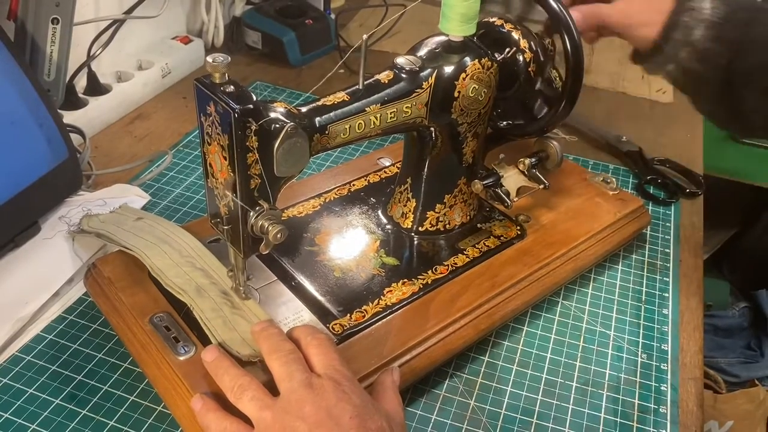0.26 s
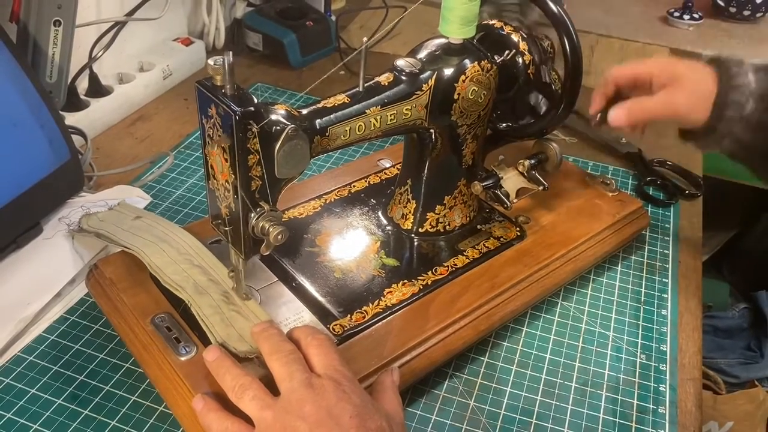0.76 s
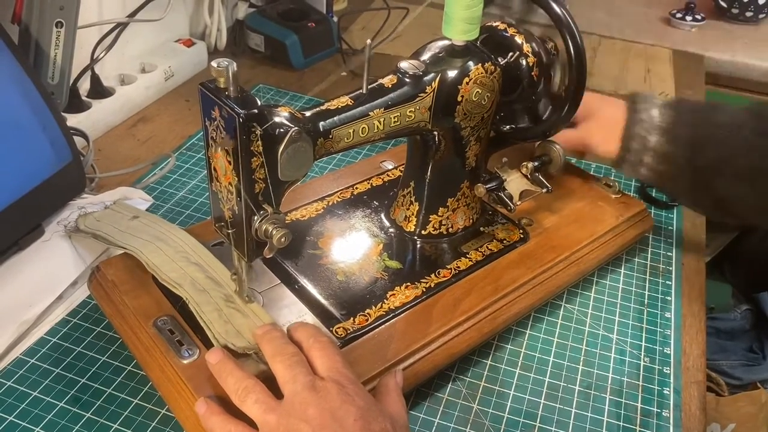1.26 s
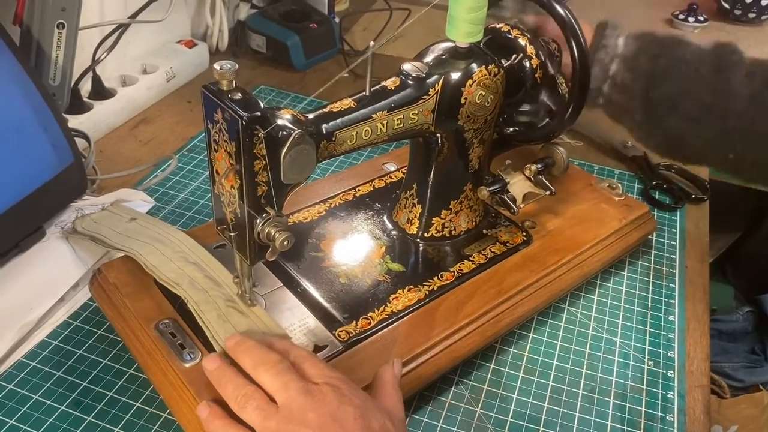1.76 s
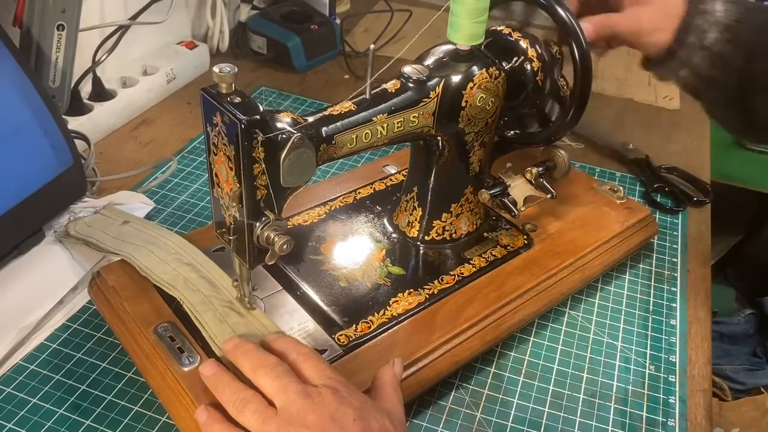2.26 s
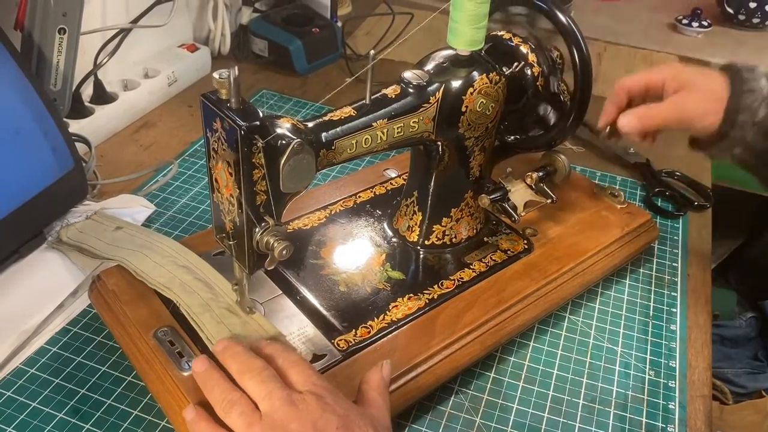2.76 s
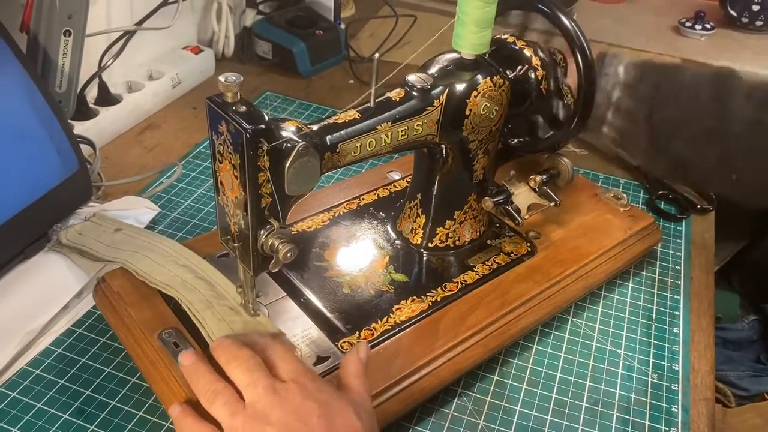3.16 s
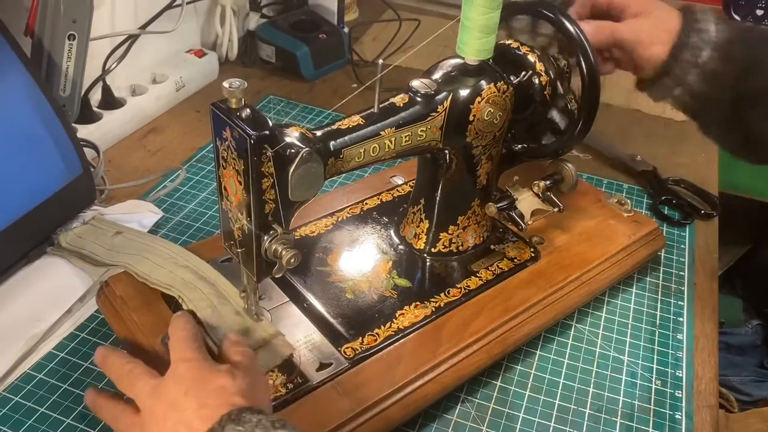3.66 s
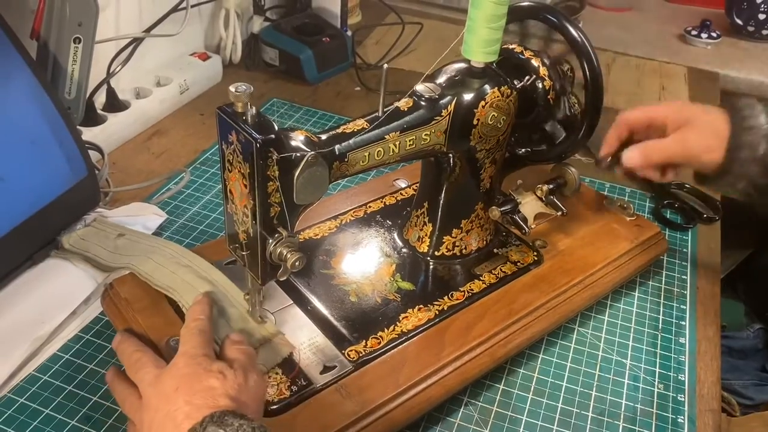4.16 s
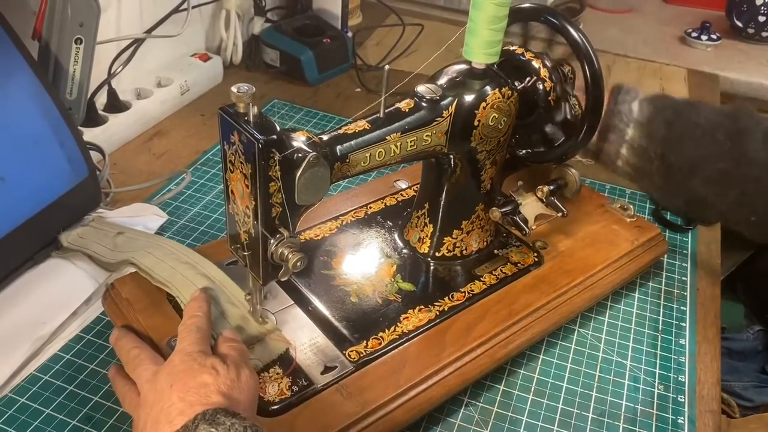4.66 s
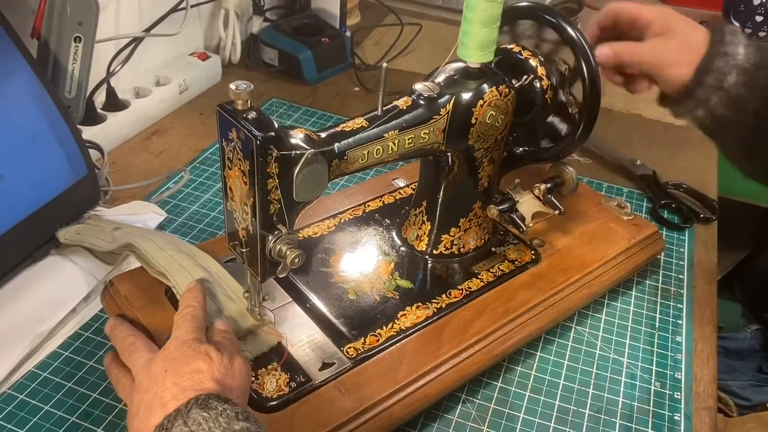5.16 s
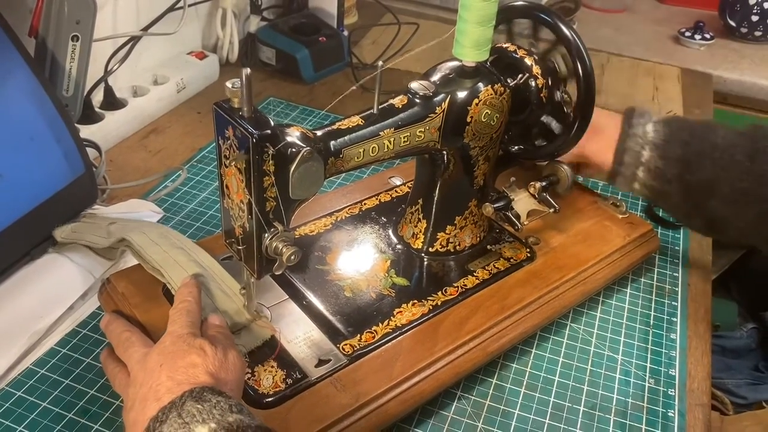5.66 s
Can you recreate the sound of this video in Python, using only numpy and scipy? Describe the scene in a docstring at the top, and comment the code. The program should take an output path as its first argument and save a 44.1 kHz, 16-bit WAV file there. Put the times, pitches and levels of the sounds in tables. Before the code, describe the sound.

An old hand-cranked sewing machine heard close in a small workshop. Each stitch is a hollow wooden-iron knock followed by a lighter second knock, with metallic chatter and gear rattle between. About four stitches a second, steady until three and a half seconds, then softer and gradually slower, with loose taps. Low bench rumble underneath; short dry room, close stereo microphone, slightly louder on the left.

```python
"""A hand-cranked cast-iron sewing machine on a hollow wooden base stitches about four times a second, then
slows. Every stitch has a needle-bar knock, a shuttle knock and lighter contacts near fixed crank angles, made
as clicks that ring the modes of wood and iron and start noisy chatter in small steel parts; gears and thread
rattle between. Below it the bench rumbles as filtered noise, and now and then a dull bump with a sinking pitch
shakes the microphone pair. A close pair of microphone ports hears the machine from the left, with a short
diffuse workshop tail behind it."""
import sys
import numpy as np
from scipy import signal
from scipy.fft import rfft, irfft
from scipy.io import wavfile

SR = 44100
rng = np.random.default_rng(int(sys.argv[2]) if len(sys.argv) > 2 else 0)


def generate_wav(signal):
    """Clip the signal to [-1, 1] and save it as 16-bit WAV at the path in sys.argv[1]."""
    frames = np.transpose(np.atleast_2d(signal))
    scaled = np.clip(frames, -1, 1) * 32767
    pcm = np.round(scaled).astype(np.int16)
    wavfile.write(sys.argv[1], SR, pcm)


N = 260190

# All levels in dB are relative: body, chatter and port gains come on top.
# Needle-bar knocks, one a stitch. Each row: time in seconds, strength in dB.
NEEDLE_BAR = [(0.0085, -20), (0.2416, -18), (0.4718, -18.5), (0.6947, -19.5), (0.9162, -17.5),
              (1.1403, -17.5), (1.3586, -18.5), (1.5856, -18), (1.8151, -19), (2.0326, -17.5), (2.252, -19),
              (2.4763, -18), (2.6949, -18), (2.9248, -19), (3.1588, -18), (3.3939, -18.5), (3.6283, -21),
              (3.888, -23), (4.1276, -21), (4.3659, -22), (4.6197, -22), (4.8719, -22), (5.1313, -24),
              (5.45, -28), (5.8051, -31)]
# Shuttle knocks, about a quarter of a stitch later. Each row: time in seconds, strength in dB.
SHUTTLE = [(0.0648, -29), (0.2987, -25), (0.5222, -23), (0.7498, -24), (0.9699, -23.5), (1.1919, -20.5),
           (1.4122, -22.5), (1.6419, -22), (1.8673, -21.5), (2.0847, -22.5), (2.308, -21), (2.527, -20.5),
           (2.7501, -22.5), (2.9836, -26.5), (3.2138, -24.5), (3.4519, -23.5), (3.6925, -29),
           (3.9454, -23.5), (4.1819, -27), (4.4237, -27), (4.6808, -24.5), (4.9335, -27), (5.2038, -32),
           (5.5273, -35)]
# Louder slack taps, more of them as the crank slows. Each row: time in seconds, strength in dB.
SLACK_TAPS = [(1.711, -36.5), (3.57, -34.5), (3.773, -38.5), (4.019, -39), (4.257, -35.5), (5.013, -34.5),
              (5.059, -36.5), (5.289, -35.5), (5.312, -41), (5.363, -34.5), (5.612, -42.5), (5.628, -37),
              (5.656, -35.5), (5.71, -30)]
# Light contacts in every stitch, at the head and at the bed. Each row: share of the stitch (0 to 1),
# clack in dB, base boom in dB, arm ring in dB, treble in dB above the clack.
FEED = [(.105, -45.5, -39, -42, -7)]
LINKAGE = [(.35, -56.5, -44.5, -49, -0.5), (.43, -58, -42.5, -52.5, 0.5), (.555, -52.5, -41, -50.5, -5.5),
           (.62, -61, -48, -55, -4.5), (.765, -67.5, -41, -63, -2), (.845, -62.5, -47.5, -54, 0)]
# How a blow of usual strength sounds. Each: usual strength in dB, clack in dB, arm ring in dB, treble in dB
# above the clack, clack in dB per dB of strength, arm ring in dB per dB of strength,
# treble in dB per dB of crank force.
NEEDLE_VOICE = (-20, -37, -32.5, -1, 0.11, 1.26, .6)
SHUTTLE_VOICE = (-25, -36, -30.5, 0.76, 0, 0.7, 0.73)
TAP_VOICE = (-34.5, -47, -56, -4, 1.04, 2.5, -0.3)
# Modes of the wooden base; close modes of opposite polarity swell, then cancel. Each row: frequency in Hz,
# t60 in seconds, polarity (+1 or -1), dB under the needle bar, dB under the shuttle, dB in the rattle.
BASE_MODES = [(291.3, 0.05, 1, -6.5, 0, -12), (309.9, 0.059, -1, 1.5, 5.5, -2),
              (365.8, 0.081, 1, -0.5, -2, 1.5), (390.5, 0.054, -1, -11.5, -11, -2),
              (468.6, 0.082, -1, -25.5, -16.5, -6.5), (508.7, 0.13, 1, -20, -23, -7),
              (518.5, 0.037, -1, -28, -22, -13), (706, .08, 1, -27.5, -25.5, -15.5),
              (832, 0.0093, -1, -31.5, -31, -23.5)]
# Modes of the iron arm. Each row: the same columns and units as the base.
ARM_MODES = [(985, 0.035, 1, -12, -3, -8), (1087.6, 0.053, -1, -3.5, -3, -0.5),
             (1163, 0.055, 1, -3.5, -6.5, 0), (1300, 0.043, -1, -9, -11, -0.5),
             (1469, 0.022, 1, -12.5, -18.5, 6.5)]
# Modes of small steel parts. Each row: frequency in Hz, width in Hz, dB under the needle bar,
# dB under the shuttle.
STEEL_MODES = [(1630, 140, 2.5, 4.5), (1869, 160, 2.5, 7.5), (2272, 52, -4.5, 4.5), (2521, 55, 0.5, -1.5),
               (2730, 74, -1, -16), (3124, 96, 0.5, -7), (4204, 76, -4, -15.5), (4474, 140, -5.5, -19),
               (4866, 70, -3, -5.5), (5300, 79, -8.5, -2.5), (5710, 120, -8.5, -5.5),
               (6040, 200, -11.5, -9.5), (6444, 35, -8, -18.5), (6480, 53, -14.5, -17)]
# Spectrum of the unpitched clack. Each row: frequency in Hz, level in dB.
CLACK = [(500, 11), (1000, 2), (2000, 1.5), (2800, -2), (3500, -23), (4500, -7.5), (5800, -11),
         (7000, -26.5), (8500, -55)]
# Loose play in base, arm, steel and steel treble, loud under load, then easing. Each entry: idle level in dB,
# load from (share of the stitch), level there in dB, load to (share of the stitch), level there in dB.
RATTLE = dict(base=(-49, -0.2, -43, 0.72, -44), arm=(-67, 0.15, -56, 0.73, -58),
          steel=(-67.5, 0.1, -65, 0.63, -58), treble=(-65.5, .2, -55, 0.7, -59.5))
# Force on the crank. Each row: time in seconds, force in dB.
EFFORT = [(0, 3.5), (1, 2), (2, 3), (3, 2.5), (3.7, 1.5), (4.4, 1.5), (5, 1.5), (5.3, -3), (5.6, -3.5),
          (5.9, -3.5)]
# Rumble of bench and building. Each row: frequency in Hz, level in dB per Hz.
RUMBLE = [(15, -23.5), (25, -9), (38, 3), (59, 7), (102, -5.5), (123, -15), (172, -1), (204, -21.5),
          (260, -13), (340, -27.5), (570, -120)]
# Right port against left. Each row: frequency in Hz, phase behind in radians, level in dB,
# share of unrelated sound (0 to 1).
PORTS = [(30.2, 1.3, -6.5, 0.84), (62.4, 2.4, -3.5, 0.28), (107, 2.08, -6, 0.71), (187, 3.4, -1.5, 0.45),
         (279, 4.675, -4, 0.061), (372, 4.65, -8.5, 0.06), (710, 4.51, -4, 0.43), (990, 4.99, -1, 0.13),
         (1240, 5.07, -7.5, 0.13), (1554, 8.13, -9, 0.13), (2010, 7.79, -2, 0.59), (2420, 8.57, -8.5, 0.63),
         (3250, 3.77, -9, 0.94), (4310, 8.22, 2.5, 1), (5250, 9.18, -1.5, 1), (6130, 11.9, -3, 0.7),
         (6220, 9.46, -3, 0.65), (7950, 3.86, -5, 0.13)]
# Dull bumps that reach the microphone pair directly. Each row: time in seconds, level in dB, time constant of
# the sinking pitch in ms.
BUMPS = [(1.858, -35.5, 10.7), (1.898, -38, 11), (3.088, -39.5, 11.7), (3.904, -46, 14), (4.125, -37, 12.7),
         (4.299, -34.5, 4.7), (4.881, -39, 9.2)]

TOUCH_S = 0.0016   # the parts touch this long before the blow is at full strength
TREBLE_HZ = 3400   # steel above this has its own share of each blow and its own rattle
STITCH_BEFORE_S, LAST_STITCH_S = 0.225, 0.37
LOAD_EDGE = 0.025   # share of the stitch that the load takes to come and go
WANDER, UNEVEN_DB = 0.006, 2   # light contacts vary in angle (share of the stitch) and strength
RUMBLE_DB, RUMBLE_FOLLOWS = -44.5, 0.68   # rms at 0 dB of crank force; dB per dB of crank force
SHOP_T60_S, SHOP_DB = 0.28, -18.5
TOP_STOP_HZ = 9140.04   # the top is 40 dB down from here


def amp(db):
    """dB to gain."""
    return 10 ** (np.asarray(db) / 20)


def rms_one(x):
    """Scale to rms 1."""
    return x / np.sqrt(np.mean(x ** 2) + 1e-20)


def on_grid(rows, column=1, size=N):
    """One column of a spectrum at every FFT bin, straight on a log-frequency axis."""
    rows = np.array(rows)
    hz = np.maximum(np.fft.rfftfreq(size, 1 / SR), 1)
    return np.interp(np.log(hz), np.log(rows[:, 0]), rows[:, column])


def crank_times():
    """Times at which each stitch starts, with one before and one after."""
    knocks = np.array(NEEDLE_BAR)[:, 0]
    return np.r_[knocks[0] - STITCH_BEFORE_S, knocks, knocks[-1] + LAST_STITCH_S]


def effort(t):
    """Force on the crank in dB."""
    return np.interp(t, *np.transpose(EFFORT))


def bench():
    """Low rumble of bench and building: shaped noise, partly driven by the cranking."""
    level_db = RUMBLE_DB + RUMBLE_FOLLOWS * effort(np.arange(N) / SR)
    spectrum = rfft(rng.standard_normal(N)) * amp(on_grid(RUMBLE))
    return amp(level_db) * rms_one(irfft(spectrum, N))


def grains(per_s, spread_db):
    """Random tiny contacts of very uneven size; rms 1."""
    sizes = amp(spread_db * np.minimum(rng.exponential(1, N), 4))
    signed = sizes * rng.choice([-1, 1], N)
    return rms_one(signed * (rng.random(N) < per_s / SR))


def rattle():
    """Levels of the loose play in base, arm and steel, read at the crank angle between needle-bar knocks."""
    t, starts = np.arange(N) / SR, crank_times()
    angle = np.interp(t, starts, np.arange(len(starts))) % 1
    plays = []
    for idle_db, on, on_db, off, off_db in RATTLE.values():
        corners = [on - LOAD_EDGE, on, off, off + LOAD_EDGE]
        load_db = np.interp(angle, corners, [idle_db, on_db, off_db, idle_db])
        plays.append(amp(effort(t) + load_db))
    return plays


def voiced(rows, voice):
    """Rows (s, clack, boom, arm, treble dB): boom is the strength, clack and arm follow it, treble the crank force."""
    s, db = np.transpose(rows)
    usual_db, clack_db, arm_db, treble_db, clack_follows, arm_follows, treble_follows = voice
    stronger_db = db - usual_db
    clack = clack_db + clack_follows * stronger_db
    arm = arm_db + arm_follows * stronger_db
    return np.c_[s, clack, db, arm, treble_db + treble_follows * effort(s)]


def clicks(rows, *columns):
    """One click per row, at first touch; the dB of the given columns add up."""
    rows, out = np.array(rows), np.zeros(N) + 1e-18
    at = np.clip(((rows[:, 0] - TOUCH_S) * SR).astype(int), 0, N - 1)
    out[at] = amp(rows[:, list(columns)].sum(axis=1))
    return out


def ring(x, hz, t60):
    """A damped resonator: a unit click sets a sine of height about 1 ringing."""
    r, w = amp(-60 / (t60 * SR)), 2 * np.pi * hz / SR
    return signal.lfilter([0, np.sin(w)], [1, -2 * r * np.cos(w), r * r], x)


def body(modes, blows, play, blow_db, contact_s, uneven_db, bed_lead_s, column):
    """All blows and the rattle ring one set of modes; head and bed contacts reach them differently."""
    head, bed = (clicks(rows, column) for rows in blows)
    bed = np.roll(bed, -round(bed_lead_s * SR))   # the carrier loads the bed just before the shuttle clacks
    struck, loose = np.zeros(N), np.zeros(N)
    for hz, t60, polarity, head_db, bed_db, rattle_db in modes:
        uneven = amp(uneven_db * rng.standard_normal(N))
        push = uneven * (amp(head_db) * head + amp(bed_db) * bed)
        struck += polarity * ring(push, hz, t60)
        loose += ring(amp(rattle_db) * grains(220, 4.2), hz, t60)
    soft = np.hanning(int(contact_s * SR) + 3)   # the contact lasts a moment
    struck = signal.lfilter(soft / soft.sum(), [1], struck)
    smooth_play = signal.lfilter([0.01], [1, -0.99], play)
    return amp(blow_db) * struck + smooth_play * rms_one(loose)


def fade(x, t60, rise_s):
    """Each click becomes an envelope with a short rise and an exponential fall."""
    r, q = amp(-60 / (t60 * SR)), np.exp(-1 / (max(rise_s, 1e-4) * SR))
    falling = signal.lfilter([1], [1, -r], x)
    return signal.lfilter([1 - q], [1, -q], falling)


def chatter(blows, burst_t60, tail_t60, tail_db):
    """Level of the noise after each blow: a short burst of chatter with a longer, weaker tail."""
    return amp(2.0) * fade(blows, burst_t60, 0.0014) + amp(tail_db) * fade(blows, tail_t60, 0.0041)


def steel(contacts, plays):
    """Blows, chatter and gear ticks, heard bare and through the steel modes, below and above the treble split."""
    bare = rfft(grains(9000, 4.73)) * amp(on_grid(CLACK))
    high = np.fft.rfftfreq(N, 1 / SR) > TREBLE_HZ
    bare_rms, out = np.std(irfft(bare, N)), np.zeros(N)
    for treble, columns, play in [(False, (1,), plays[0]), (True, (1, 4), plays[1])]:
        ticks = fade(np.abs(grains(300, 3.0)), 0.018, 0.0006)   # separate teeth and links
        play = play * (0.54 + 0.93 * rms_one(ticks))
        head, bed = (clicks(rows, *columns) for rows in contacts)
        head_level = chatter(head, 0.033, 0.12, -9.5)
        bed_level = chatter(bed, 0.032, 0.14, -12.5)
        clack = irfft(bare * (high == treble), N) / bare_rms
        out += amp(-1.5) * (head_level + bed_level + play) * clack
        shake = grains(5000, 2.9)
        for k, (hz, width, head_db, bed_db) in enumerate(STEEL_MODES):
            if (hz > TREBLE_HZ) != treble:
                continue
            blows = amp(head_db) * head + amp(bed_db) * bed
            bounce = 0.71 * blows + np.roll(blows, round(0.0032 * SR))   # a light touch, then the part seats
            shaken = amp(head_db) * (head_level + play / 2) + amp(bed_db) * (bed_level + play / 2)
            knock = (-1) ** k * amp(-11.0) * bounce   # neighbours are struck in alternate polarity
            noise = amp(-53.5) * np.sqrt(width) * shaken * shake
            out += ring(knock + noise, hz, 1.69 / width)
    return out


def machine(blows, uneven_db):
    """Base, arm, steel parts and bench as heard from one side."""
    base_play, arm_play, *steel_plays = rattle()
    base = body(BASE_MODES, blows, amp(2.5) * base_play, 4.85, 0.0012, uneven_db, 0.0016, column=2)
    too_small = signal.butter(4, 250, "high", fs=SR, output="sos")   # to radiate below its modes
    base = signal.sosfilt(too_small, base)
    arm = body(ARM_MODES, blows, amp(-0.5) * arm_play, 2.25, 0.00053, uneven_db, 0.0006, column=3)
    return base + arm + steel(blows, steel_plays) + bench()


def ports(near, other):
    """The right port hears the same side shifted in phase and mostly weaker, mixed with other faces of the machine."""
    size = N + SR // 2   # padded, so that the end does not wrap round to the start
    apart = np.clip(on_grid(PORTS, column=3, size=size), 0, 1)
    gain = amp(on_grid(PORTS, column=2, size=size))
    colour = gain * np.exp(-1j * on_grid(PORTS, size=size))
    mixed = np.sqrt(1 - apart ** 2) * rfft(near, size) + apart * rfft(other, size)
    return np.array([near, irfft(colour * mixed, size)[:N]])


def workshop(x):
    """Diffuse tail of the room: decaying noise, different at each port, after a 4 ms gap."""
    t = np.arange(int(SHOP_T60_S * SR)) / SR
    tail = rng.standard_normal((2, len(t))) * amp(-60 * t / SHOP_T60_S) * (t > 0.004)
    tail = rms_one(tail) / np.sqrt(len(t))
    return amp(SHOP_DB) * signal.fftconvolve(x, tail, axes=1)[:, :N]


def looped(contacts):
    """Voiced rows for light contacts, repeated each stitch with the crank force and some chance."""
    starts, rows = crank_times(), []
    for share, *levels, treble_db in contacts:
        chance = rng.standard_normal((len(starts) - 1, 4))
        s = starts[:-1] + (share + WANDER * chance[:, 0]) * np.diff(starts)
        levels_db = levels + effort(s)[:, None] + UNEVEN_DB * chance[:, 1:]
        rows.append(np.c_[s, levels_db, np.full(len(s), treble_db)])
    rows = np.vstack(rows)
    return rows[(rows[:, 0] > TOUCH_S) & (rows[:, 0] < N / SR)]


def bumps():
    """Dull bumps whose pitch sinks quickly from the start; in step at both ports, left louder."""
    out, t = np.zeros(N), np.arange(int(0.12 * SR)) / SR
    for s, db, sink_ms in BUMPS:
        falling_hz = 52 + 190 * np.exp(-1000 * t / sink_ms)
        tone = np.sin(2 * np.pi * np.cumsum(falling_hz) / SR)
        thud = tone * amp(-60 * t / 0.13) * (1 - np.exp(-t / 0.011))
        start = int(s * SR)
        out[start:start + len(t)] += amp(db + 9) * thud
    return out * amp([[1.5], [-1.5]])


def scene():
    """Machine and bench at the two ports, with the room; the far faces favour other modes at each blow."""
    head = np.vstack([voiced(NEEDLE_BAR, NEEDLE_VOICE), looped(FEED)])
    bed = np.vstack([voiced(SHUTTLE, SHUTTLE_VOICE), voiced(SLACK_TAPS, TAP_VOICE), looped(LINKAGE)])
    near_side = machine((head, bed), uneven_db=1.13)
    far_faces = machine((head, bed), uneven_db=3.0)
    close = ports(near_side, far_faces)
    return close + workshop(close) + bumps()


def record(dry):
    """The microphone signal loses its deep bass and its top."""
    lean = signal.sosfilt(signal.butter(3, 40, "high", fs=SR, output="sos"), dry)
    return signal.sosfilt(signal.cheby2(10, 40, TOP_STOP_HZ, fs=SR, output="sos"), lean)


dry = scene()
out = record(dry)
generate_wav(out)
```